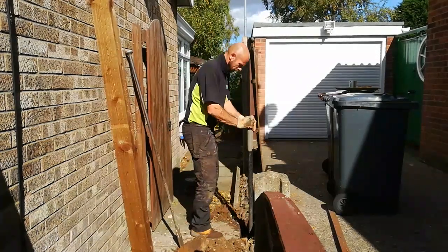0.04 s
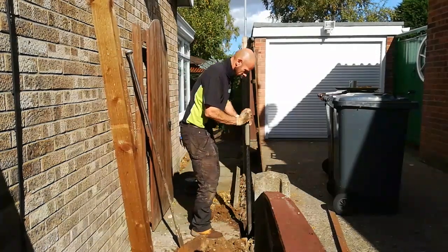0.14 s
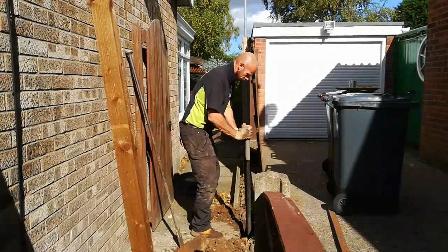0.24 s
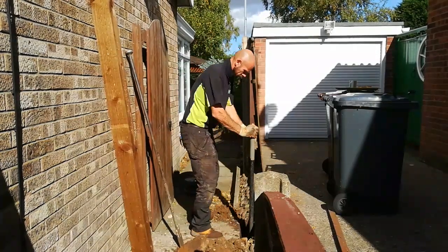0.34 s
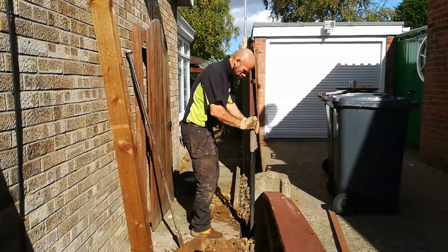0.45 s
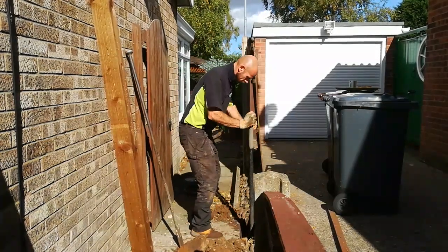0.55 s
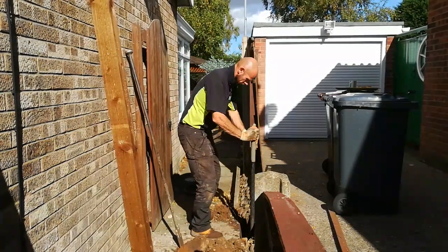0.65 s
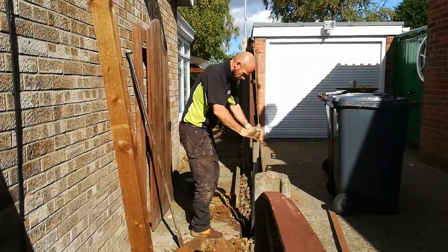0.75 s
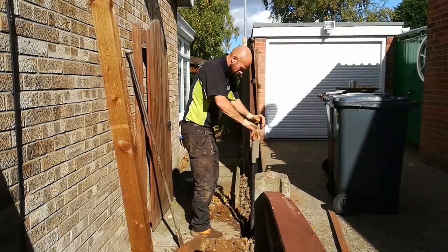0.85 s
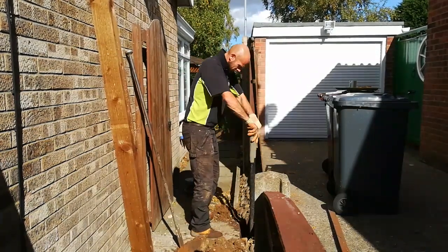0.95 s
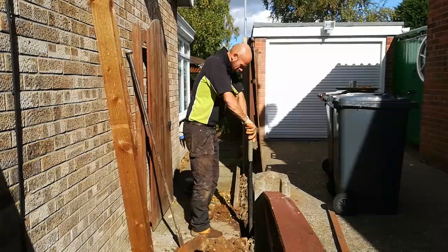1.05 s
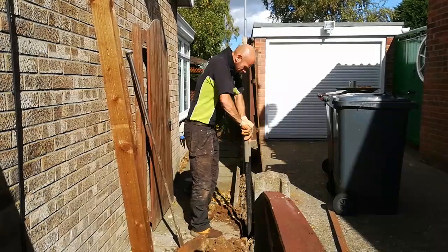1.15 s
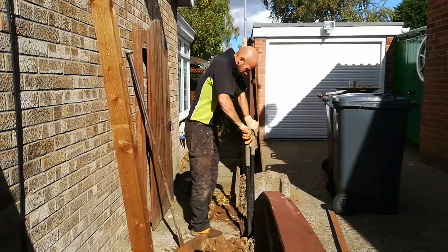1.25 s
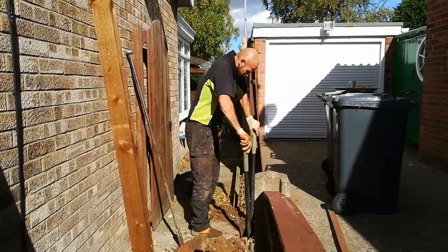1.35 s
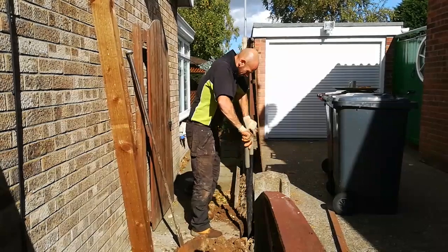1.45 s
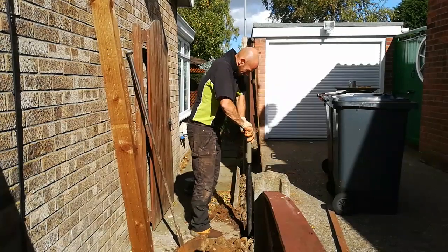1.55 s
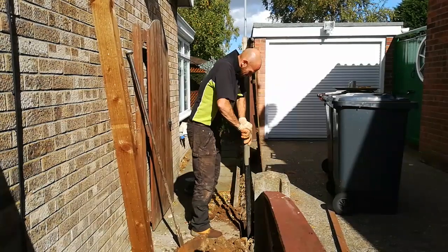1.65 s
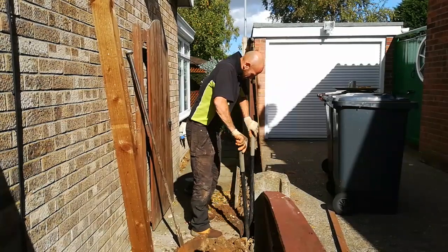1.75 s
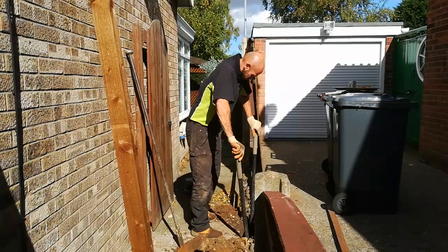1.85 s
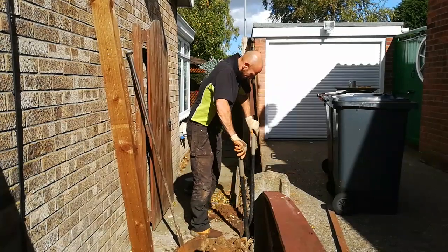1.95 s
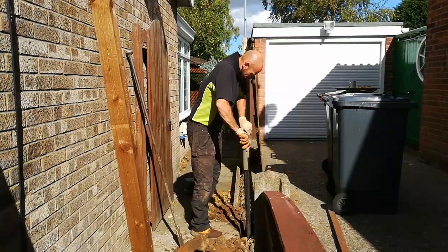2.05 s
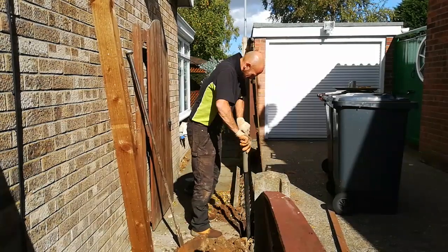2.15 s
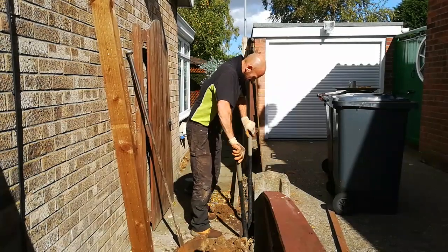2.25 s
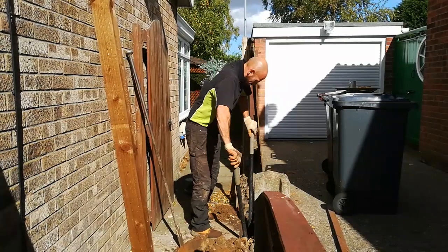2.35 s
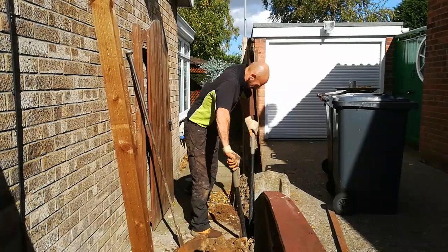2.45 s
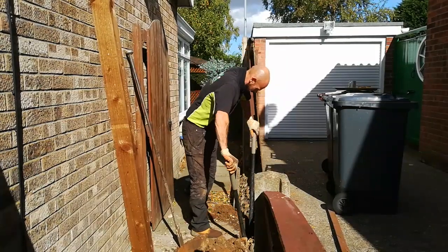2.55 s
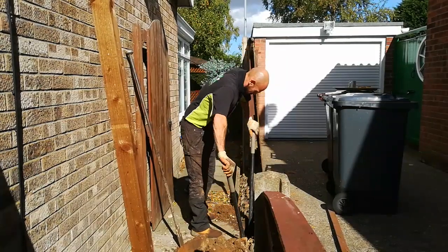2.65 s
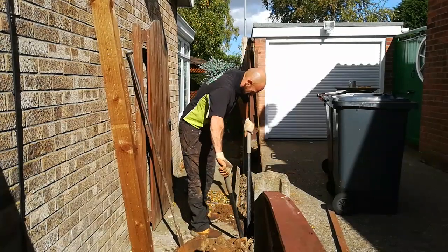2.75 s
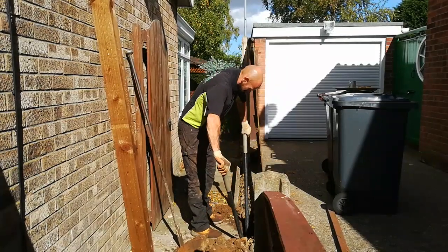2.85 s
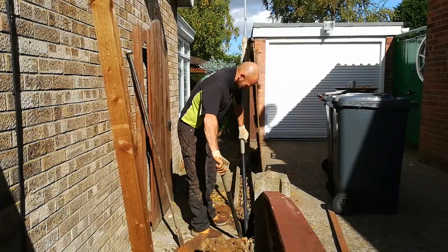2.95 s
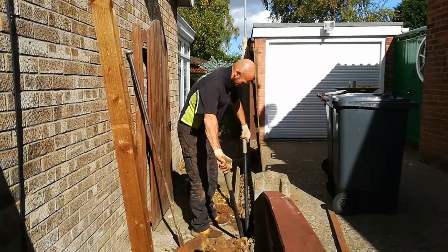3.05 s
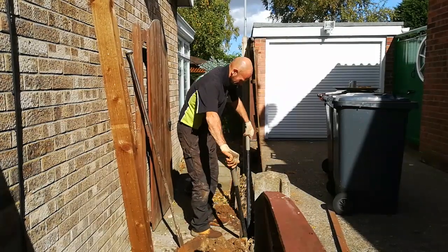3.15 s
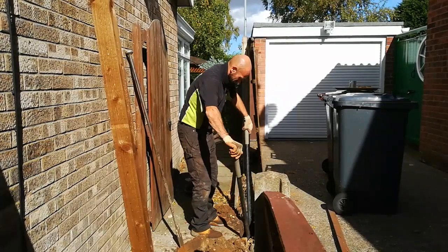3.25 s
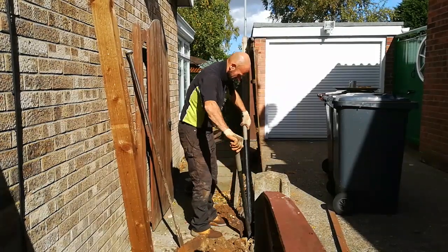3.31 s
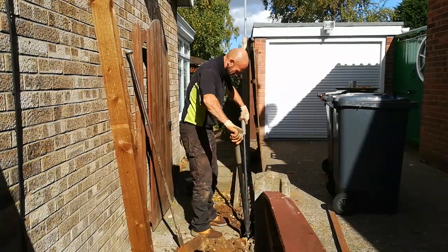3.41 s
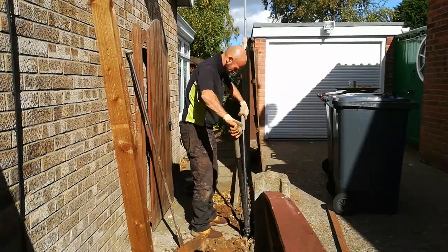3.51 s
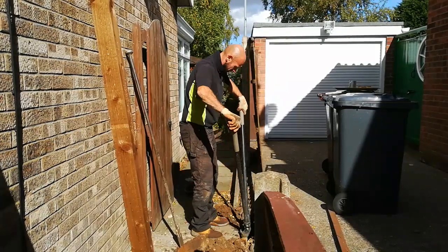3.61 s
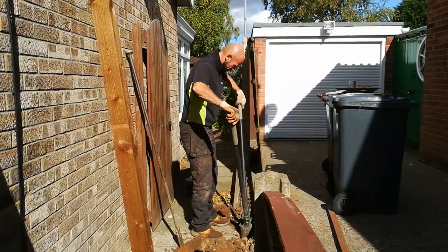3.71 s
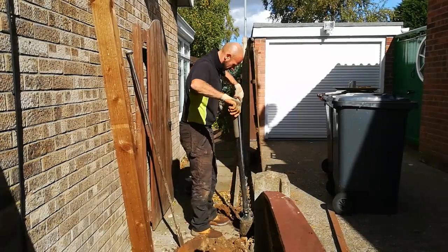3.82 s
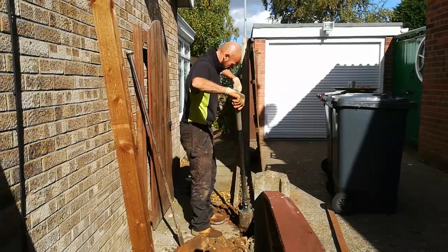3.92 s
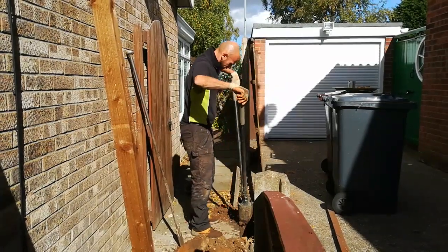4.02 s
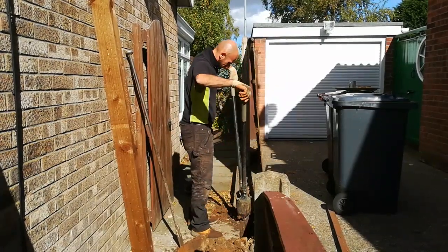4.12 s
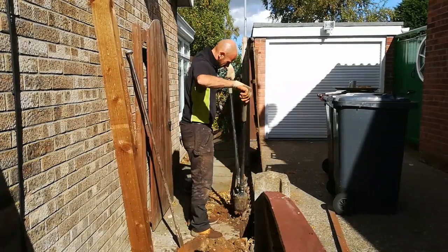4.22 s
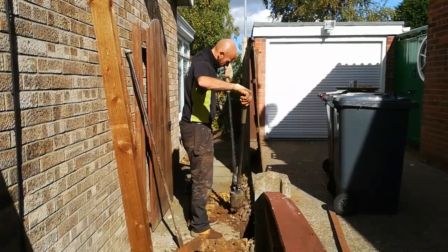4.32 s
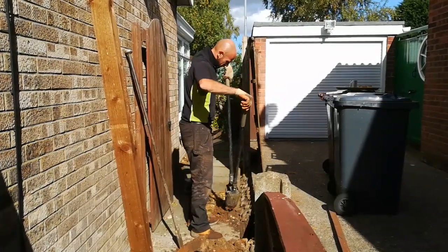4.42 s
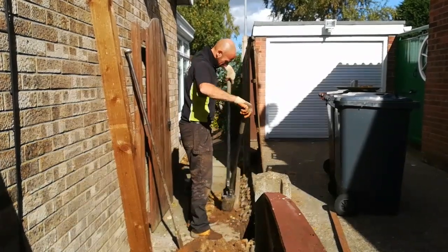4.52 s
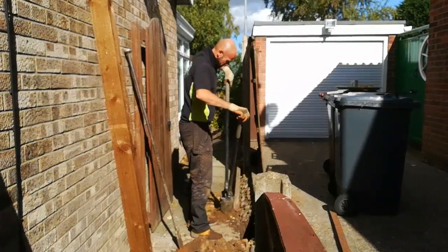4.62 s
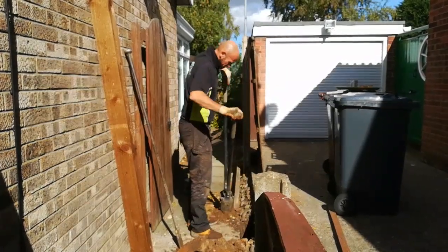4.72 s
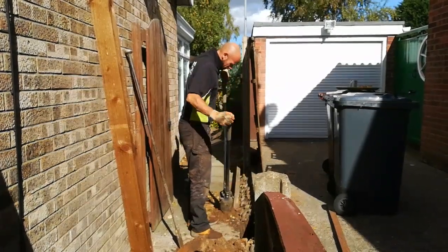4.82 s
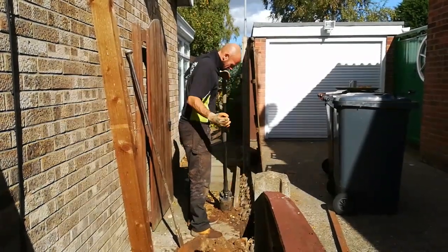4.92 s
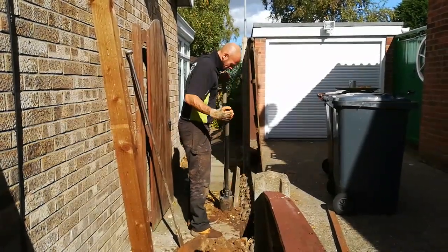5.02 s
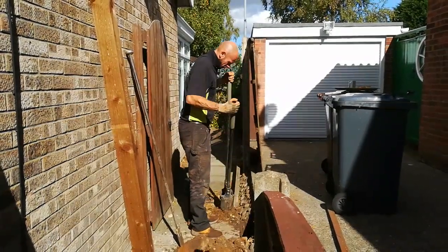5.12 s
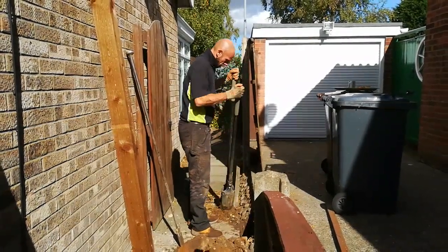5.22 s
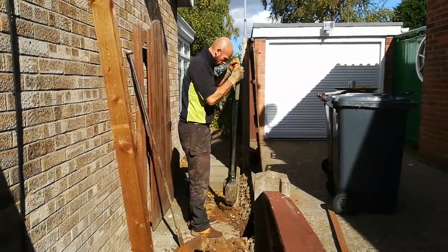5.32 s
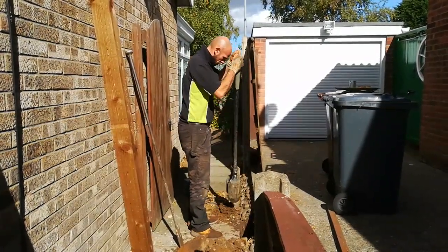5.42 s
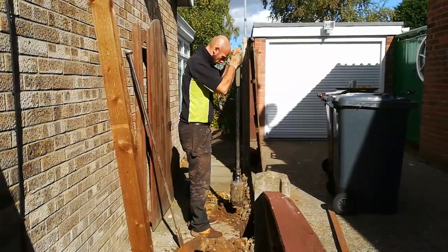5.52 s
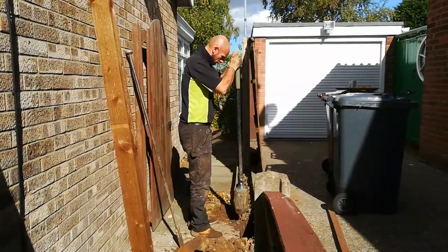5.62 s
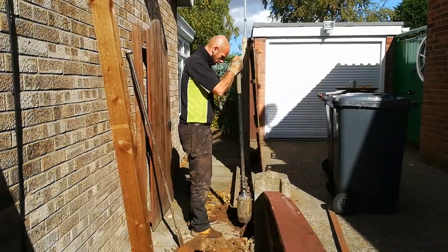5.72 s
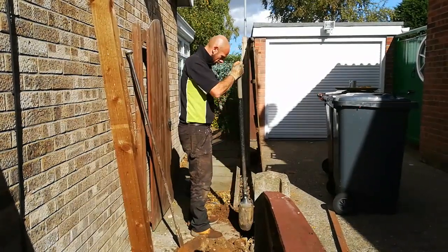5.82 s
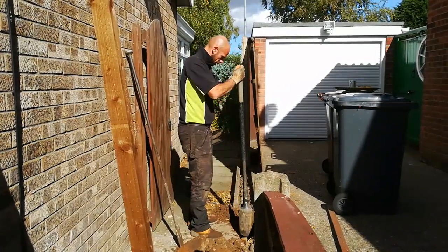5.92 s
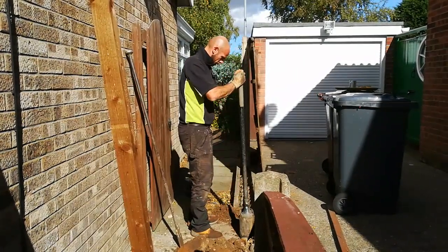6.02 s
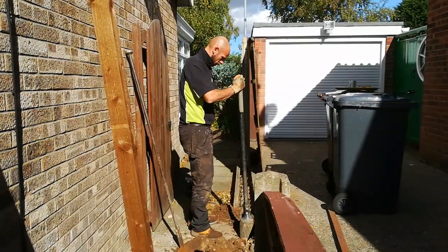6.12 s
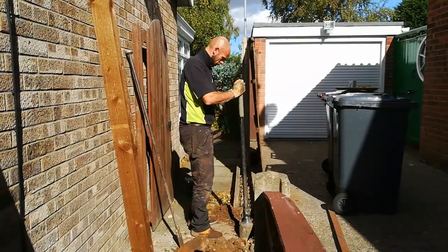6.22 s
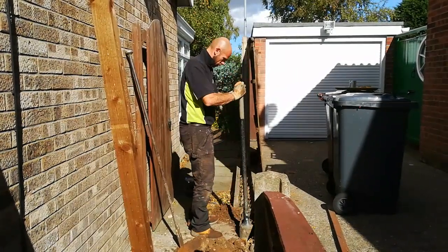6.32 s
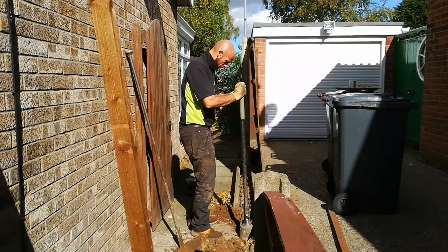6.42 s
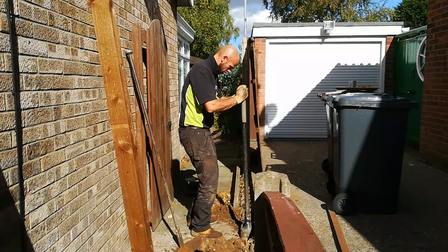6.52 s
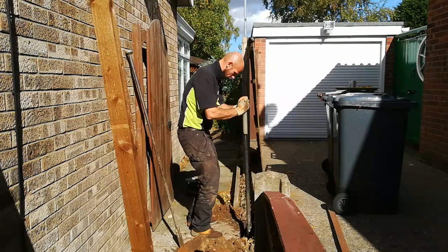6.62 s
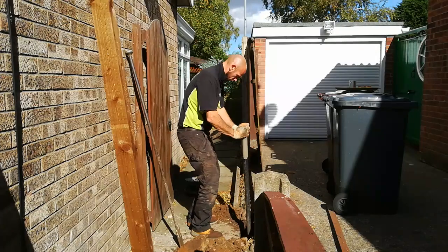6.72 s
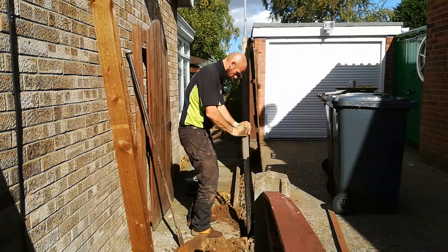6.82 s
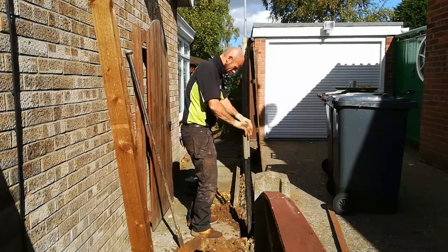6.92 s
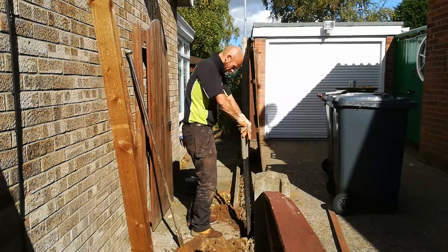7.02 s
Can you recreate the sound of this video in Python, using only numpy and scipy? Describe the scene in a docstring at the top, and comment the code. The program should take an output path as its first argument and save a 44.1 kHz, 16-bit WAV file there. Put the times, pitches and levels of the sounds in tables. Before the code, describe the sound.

A long steel spade works stony soil in a narrow outdoor passage. After a tiny skim and knock on stone, a hard thrust hits at 0.2 s, a sharp gritty crunch with a low thud and brief steely ring; a second follows at 0.55 s. A stone knock at 0.8 s leads into a short high squeak near 0.9 s. From 1 to 2.7 s the buried blade is levered: soft, uneven grinding strokes, small crunches, knocks and a weaker squeak around 1.4 s. Duller knocks come at 3.3 and 3.45 s. Crumbs slide off; a clod drops at 4.5 s, pebbles tick near 4.95 s, and faint clinks ring from 5.2 to 6.2 s. The third heavy thrust crunches and booms at 6.65 s, with small knocks after. Brick walls return short echoes. Faint traffic dwindles, then rises slightly; a lumpy low rumble fades after 4.5 s.

```python
"""Spade in stony soil

A long steel spade is driven into stony soil in a narrow passage between brick walls.
Three hard thrusts crunch and thud: bursts of shaped grain noise, resonant steel and low decaying sines.
Between them the levered blade grinds in grain noise, squeaks in short sines, and knocks and clinks on stones.
Far traffic, coloured noise, dwindles and returns a little over a lumpy low drone and still air."""
import sys
import numpy as np
from scipy import signal
from scipy.fft import rfft, irfft, next_fast_len
from scipy.io import wavfile

SR = 44100
rng = np.random.default_rng(int(sys.argv[2]) if len(sys.argv) > 2 else 0)


def generate_wav(signal):
    """Clip the signal to [-1, 1] and save it as 16-bit WAV at the path in sys.argv[1]."""
    frames = np.transpose(np.atleast_2d(signal))
    scaled = np.clip(frames, -1, 1) * 32767
    pcm = np.round(scaled).astype(np.int16)
    wavfile.write(sys.argv[1], SR, pcm)


N = 311346
TIME = np.arange(N) / SR

# All levels in the tables are relative; the layers and the mix trim them further.
# Blade crunches in the soil; at 4.5 s a clod is shaken off it and drops:
# (peak time [s], level [dB], rise [s], decay [s], body [dB], treble [dB],
# blade resonance [dB], note of the struck spot [Hz])
CRUNCHES = [(.175, -16, 0.0042, 0.0062, 1.5, -0.5, 3.5, 1280),
            (0.34, -39.5, 0.012, .015, -5, 2.5, 4.5, 1770), (.565, -18, 0.0065, 0.0053, 4, 1, 2, 1740),
            (1.457, -43.5, 0.0046, 0.017, 4.5, 16.5, -8, 4700),
            (1.622, -33.5, .002, 0.015, 2, -22, 3, 1180), (1.657, -40, 0.014, 0.022, 4, -27, 0, 2950),
            (1.917, -42.5, 0.012, .021, -16, -10.5, 8.5, 3300),
            (2.004, -38.5, 0.01, 0.0032, 1, 9.5, 8, 3240), (2.572, -40.5, 0.018, .012, 1, -6.5, -15, 1160),
            (2.637, -38.5, 0.0082, 0.011, 4.5, 5.5, 0, 2900),
            (4.502, -30, .005, 0.024, -6.5, 0.5, -11, 836),
            (6.654, -17.5, 0.0065, 0.0081, 2, 0.5, -5.5, 547)]
# Buried blade knocks on stones: (peak time [s], level [dB], treble [dB], rise [s], decay [s])
KNOCKS = [(.095, -31.5, -13, 0.005, 0.0063), (0.152, -29, 6.5, 0.00044, 0.0061),
          (.469, -42, -7, .007, 0.015), (0.773, -35.5, -27, .0008, 0.012), (1.095, -44, -16, .0007, .014),
          (1.41, -35.5, -13, .0017, 0.012), (3.296, -42.5, 1, 0.0059, 0.016),
          (3.445, -34.5, -0.5, 0.0041, 0.014), (3.973, -56.5, -5.5, 0.00077, 0.03),
          (6.589, -46.5, -8, 0.013, 0.013), (6.631, -27, 8, 0.00068, 0.012),
          (6.788, -41.5, -18, 0.0018, 0.011), (6.882, -46, -21, 0.0028, .005)]
# Blade is levered through the soil, one row a stroke: (start [s], length [s], grinding [dB], grit [dB])
STROKES = [(0.928, .05, -50.5, -87), (1.15, 0.11, -52, -57), (1.393, 0.18, -51, -61),
           (1.658, 0.11, -44, -53), (1.948, 0.14, -54.5, -62), (2.188, 0.11, -50, -61),
           (2.4, 0.1, -58.5, -64), (2.642, 0.041, -47, -72), (6.938, 0.025, -53, -67)]
# Crumbs slide off the lifted blade: (start [s], length [s], level [dB])
CRUMBS = [(3.73, 0.17, -72.5), (4.475, .03, -56), (4.894, 0.096, -57), (5.113, .02, -64)]
# Steel sticks and slips on stone: (start [s], length [s], pitch [Hz], glide [octaves], level [dB])
SQUEAKS = [(.854, 0.027, 3750, -0.02, -26.5), (.855, 0.014, 5470, 0.011, -39.5),
           (.872, .046, 3044, -0.025, -29.5), (.883, 0.016, 2500, .02, -33),
           (.886, 0.081, 3680, 0.0028, -46), (1.401, 0.019, 2290, 0.013, -35),
           (1.542, .012, 1765, 0.0067, -35.5)]
# Edge skims a stone just before a thrust: (start [s], length [s], level [dB])
SKIMS = [(0.087, 0.042, -49.5), (6.586, 0.02, -45)]
# High modes that a skim excites: (frequency [Hz], level [dB])
SKIM_MODES = [(7400, -4.5), (8320, 1), (11250, -4)]
# Lifted blade taps a stone and rings freely: (peak time [s], level [dB], treble [dB], rise [s])
CLINKS = [(5.159, -49.5, 8, 0.0022), (5.68, -54, -13, 0.0027), (5.772, -65.5, 3, 0.0045),
          (6.068, -43, -4.5, 0.0067), (6.177, -49.5, 12, 0.0018)]
# Pebbles drop off the blade: (peak time [s], level [dB])
PEBBLES = [(4.425, -65), (4.895, -56), (4.954, -47.5), (4.989, -55)]
# Whole spade jolts, with a thud in the ground, a woody clunk and a ring:
# (time [s], thud [Hz], thud [dB], deep boom [dB], clunk [Hz], clunk [dB], ring [dB])
JOLTS = [(.172, 125.2, -20.5, -39, 456, -34.5, -48), (.561, 111.3, -23.5, -29.5, 273, -34, -42),
         (2.636, 127, -52, -58, 560, -55, -56), (3.292, 118, -42, -60, 747, -59.5, -63),
         (3.445, 129, -55.5, -39, 760, -57, -63), (4.502, 88.4, -49.5, -62, 810, -43, -60),
         (6.645, 108.9, -16.5, -28.5, 546, -31, -44.5)]
# Deep boom of the ground: (frequency [Hz], level [dB], swell [s])
BOOM = [(46.2, -4.5, 0.061), (75.4, -0.5, 0.026)]

# Resonances of the blade held in the soil: (frequency [Hz], width [Hz], level [dB])
BLADE_IN_SOIL = [(1222, 49, 7.5), (1740, 170, 0), (2231, 120, 2.5), (2723, 116, 1), (3023, 14, -8),
                 (3275, 67.6, -1.5), (3750, 65, -4.5), (4153, 40, -4), (4700, 150, 0.5), (5410, 70, -11.5),
                 (6380, 130, -4.5), (7350, 130, -2.5), (7800, 70, -2), (8730, 160, 0.5), (10960, 90, 8)]
# Modes of the free blade: (frequency [Hz], width [Hz], level [dB])
FREE_BLADE = [(2234, 48, 11.5), (2890, 60, 4), (3300, 47, 7), (3880, 86, -6.5), (4150, 99, -1),
              (4460, 74, 0.5), (5370, 110, 0), (6100, 100, 3.5), (6650, 98, 4), (7840, 145, 7),
              (9550, 360, 5.5)]
# Long rings of the steel shaft: (frequency [Hz], level [dB], time to fall 60 dB [s])
SHAFT = [(1210, -1, 0.45), (2000, 0.5, .25), (2650, -2, .2), (3260, -5.5, 0.41), (4770, -7.5, 0.242),
         (7220, -5, 0.15), (8300, -12, .23), (10600, -7.5, 0.16)]
# Longest ring, a close group that beats: (frequency [Hz], level [dB], time to fall 60 dB [s])
SINGING = [(3575, -6, .6), (3614, -5, .7), (3675, -5, .6)]

# Spectrum of breaking soil: (frequency [Hz], density [dB per Hz])
SOIL = [(60, -5.5), (170, 6), (330, -3), (600, 0.5), (1000, -1.5), (1600, -2), (3000, -0.5), (4500, -5),
        (7000, -8), (10000, -14.5), (15500, -14.5)]
# Spectrum of steel meeting stone: (frequency [Hz], density [dB per Hz])
STONE = [(100, -18.5), (500, -3.5), (1500, -0.5), (2300, -0.5), (3000, 3.5), (4600, -1), (6200, -10),
         (8000, -12.5), (11000, -23), (15500, -23)]
# Spectrum of coarse grinding: (frequency [Hz], density [dB per Hz])
GRIND = [(150, -22.5), (500, 6), (1200, 0.5), (3000, 3), (4700, -0.5), (7000, -18.5), (14000, -30)]
# Spectrum of sand and pebbles: (frequency [Hz], density [dB per Hz])
GRIT = [(1500, -34), (4500, 1), (7200, 1), (9500, -7.5), (12500, -10.5), (15500, -6.5)]
# Spectrum of still air: (frequency [Hz], density [dB per Hz])
AIR = [(12, -30), (20, 3.5), (45, 4), (85, -43), (245, -7.5), (324, -20.5), (416, -19), (452, -23.5),
       (1820, -24.5), (2150, -45), (2400, -39), (3350, -38), (3960, -36), (12400, -38), (15500, -40)]
# Spectrum of far tyres: (frequency [Hz], density [dB per Hz])
TRAFFIC = [(30, -6.5), (70, 12), (130, 8), (220, 6), (380, -6), (600, -2.5), (950, 5), (1500, -3.5),
           (2500, -11.5), (5000, -21.5), (12000, -51)]

# Low rumble: (time [s], level [dB])
RUMBLE_LEVEL = [(0, -54), (.2, -42), (1.3, -36), (1.95, -43), (2.7, -36.5), (3.85, -48), (4.3, -40.5),
                (4.7, -60.5), (7.06, -59.5)]
# Far traffic: (time [s], level [dB])
TRAFFIC_LEVEL = [(0, -44.5), (1.8, -46), (2.4, -54), (4.8, -60.5), (6.2, -59), (7.06, -56.5)]
# Ring of the passage: (frequency [Hz], time to fall 60 dB [s])
PASSAGE = [(150, 0.59), (600, 0.32), (2000, 0.23), (5000, 0.23), (9000, 0.26), (15000, 0.18)]
# Stereo image of diffuse sound: (frequency [Hz], left-right likeness [-1 to 1])
LIKENESS = [(60, 0.99), (130, 0.98), (290, 0.79), (640, -0.49), (1400, -0.11), (3000, -0.11), (15000, -0.1)]
# The two microphones differ, before each side's power is evened: (frequency [Hz], left minus right [dB])
PORTS = [(200, 2), (600, 1), (2000, -1.7), (4500, 1), (8500, 5), (12000, 1.5), (15500, -5.5)]


def crunches(per_s=9000, spread_db=3.0, note_db=6.5, sharpness=16):
    """Soil breaks in a dense crunch; packed earth adds body, grit adds treble, stones excite the blade."""
    crunch = colour(grains(per_s, spread_db), SOIL)
    body = butter(crunch, 1000, "low")
    middle = butter(crunch, [1000, 5000], "band")
    treble = butter(crunch, 5000, "high")
    soil, on_steel = np.zeros((2, N))
    for s, db, rise, decay, body_db, treble_db, steel_db, note_hz in CRUNCHES:
        on = around(s)
        # the middle band has the opposite sign, so that the crossovers add up
        mix = from_db(body_db) * body[on] - middle[on] + from_db(treble_db) * treble[on]
        burst = from_db(db) * swell(s, rise, decay) * mix
        note = signal.lfilter(*signal.iirpeak(note_hz, sharpness, fs=SR), burst)
        soil[on] += burst + from_db(note_db) * note
        on_steel[on] += burst * from_db(steel_db)
    return soil + resonate(on_steel, BLADE_IN_SOIL)


def knocks():
    """The edge meets a buried stone, grates on it for a moment and sets the held blade resonating."""
    crack = grating(KNOCKS, colour(grains(per_s=6000, spread_db=-1.5), STONE))
    return crack + resonate(crack, BLADE_IN_SOIL)


def scrapes(grind_db=-0.5, grit_db=1.5, crumb_db=-1.5, uneven_db=1.5, steel_db=-2.0):
    """Sand and small stones grind unevenly along the steel; crumbs run off when it is lifted."""
    grinding, grit = sum(np.outer(from_db(levels), stroke(s, length)) for s, length, *levels in STROKES)
    crumbs = from_db(crumb_db) * sum(from_db(db) * stroke(s, length) for s, length, db in CRUMBS)
    stones = grains(per_s=260, spread_db=5.5)
    sand = grains(per_s=2500, spread_db=4.5)
    coarse = stones * (grinding * from_db(grind_db) + crumbs)
    fine = sand * (grit * from_db(grit_db) + crumbs)
    slips = from_db(uneven_db * drift(rate=52))
    rub = colour(coarse * slips, GRIND) + colour(fine, GRIT)
    # the point of contact wanders, favouring now one resonance, now another
    return rub + from_db(steel_db) * resonate(rub, BLADE_IN_SOIL, wander_db=8.0)


def squeaks(waver=0.026, octave_db=-20):
    """Stick and slip makes short, unsteady, gliding tones; a skim sounds several high modes together."""
    out = np.zeros(N)
    skims = [(s, length, hz, 0, db + mode_db) for s, length, db in SKIMS for hz, mode_db in SKIM_MODES]
    for s, length, hz, glide, db in SQUEAKS + skims:
        on = slice(int(s * SR), int((s + length) * SR))
        along = np.linspace(0, 1, on.stop - on.start)
        pitch_hz = hz * 2 ** (glide * along) * (1 + waver * drift(rate=900)[on])
        phase = 2 * np.pi * np.cumsum(pitch_hz) / SR
        # the octave is left out where it would lie too high
        octave = from_db(octave_db) * np.sin(2 * phase) * (4 * hz < SR)
        out[on] += from_db(db) * np.sin(np.pi * along) * (np.sin(phase) + octave)
    return out


def clinks(decay_s=0.008, level_db=2.5):
    """Out of the soil the blade is free, so its modes are favoured over the halved contact noise."""
    contacts = [(*row, decay_s) for row in CLINKS]
    touch = grating(contacts, colour(grains(per_s=12000, spread_db=1.5), STONE))
    return from_db(level_db) * (touch / 2 + resonate(touch, FREE_BLADE))


def shaft():
    """Hard blows leave the steel singing in decaying sines after the crunch has died."""
    blows = np.zeros(N)
    for s, *_, ring_db in JOLTS:
        blows[round(s * SR)] = from_db(ring_db)
    return sum(from_db(db) * ring(blows, hz, t60) for hz, db, t60 in SHAFT + SINGING)


def pebbles(rise_s=0.00032, decay_s=0.0045):
    """Small stones land with a bright, dry tick of noise."""
    contacts = [(s, db, 0, rise_s, decay_s) for s, db in PEBBLES]
    return grating(contacts, colour(rng.standard_normal(N), GRIT))


def thuds(thud_swell_s=0.01783, clunk_swell_s=0.012, flex_hz=100, flex_t60=0.515, flex_db=-64):
    """Each jolt swells and dies in low sines of ground and clunk, and the long shaft goes on flexing."""
    out = np.zeros(N)
    for s, thud_hz, thud_db, boom_db, clunk_hz, clunk_db, _ in JOLTS:
        on = around(s)
        age = np.maximum(TIME[on] - s, 0)
        tones = [(thud_hz, thud_db, thud_swell_s), (clunk_hz, clunk_db, clunk_swell_s)]
        tones += [(hz, boom_db + db, swell_s) for hz, db, swell_s in BOOM]
        for hz, db, swell_s in tones:
            envelope = age / swell_s * np.exp(1 - age / swell_s)
            out[on] += from_db(db) * envelope * np.sin(2 * np.pi * hz * age)
    return out + from_db(flex_db) * ring(out, flex_hz, flex_t60)


def passage(x, direct_db=-5.5, walls_db=-1.5, build_s=0.001, size=22050):
    """The direct sound, then close brick walls throw it back in a dense tail, duller as it dies."""
    age, hz = np.arange(size) / SR, np.fft.rfftfreq(size, 1 / SR)
    white, tail = rfft(rng.standard_normal((2, size))), 0
    for k, (_, t60) in enumerate(PASSAGE):
        # each band fades over into its neighbours
        share = at_hz([(band_hz, j == k) for j, (band_hz, _) in enumerate(PASSAGE)], hz)
        tail = tail + irfft(white * share) * np.exp(-np.log(1000) * age / t60)
    tail = tail * (1 - np.exp(-age / build_s))
    tail = rms_one(diffuse(*tail)) / np.sqrt(size)
    echoes = signal.fftconvolve(x[None], tail, axes=1)[:, :N]
    return from_db(direct_db) * x + from_db(walls_db) * echoes


def rumble(centre_hz=48.1, wander_hz=3.5, level_db=-0.5, sub_db=-2.5, lumps_db=5.0, lumps_per_s=17, crest=0.81):
    """A wavering low drone and a bed of low noise swell together in flat-topped lumps."""
    drone = np.sin(2 * np.pi * np.cumsum(centre_hz + wander_hz * drift(rate=28)) / SR)
    bed = rms_one(butter(rng.standard_normal(N), [30, 50], "band")) / 2
    lumps = lumps_db * np.minimum(drift(rate=lumps_per_s), crest)
    course_db = np.interp(TIME, *np.transpose(RUMBLE_LEVEL))
    return from_db(level_db + lumps + course_db) * (drone + from_db(sub_db) * bed)


def surroundings(air_db=-57.0, traffic_trim_db=-1.0):
    """Still outdoor air and the wash of far tyres, both wide coloured noise."""
    air = diffuse(*[colour(white, AIR) for white in rng.standard_normal((2, N))])
    traffic = diffuse(*[colour(white, TRAFFIC) for white in rng.standard_normal((2, N))])
    course_db = np.interp(TIME, *np.transpose(TRAFFIC_LEVEL))
    return from_db(air_db) * air + from_db(traffic_trim_db + course_db) * traffic


def grains(per_s, spread_db):
    """Tiny fractures of sand and stone: random clicks of either sign, uneven in size; rms 1."""
    sizes = from_db(spread_db * np.minimum(rng.exponential(1, N), 4))
    signed = sizes * rng.choice([-1, 1], N)
    return rms_one(signed * (rng.random(N) < per_s / SR))


def grating(contacts, noise):
    """Contacts (time [s], level [dB], treble [dB], rise [s], decay [s]) open the noise, each with its tint."""
    out = np.zeros(N)
    lower, treble = butter(noise, 5000, "low"), butter(noise, 5000, "high")
    for s, db, treble_db, rise, decay in contacts:
        on = around(s)
        # opposite signs make the crossover add up
        out[on] += from_db(db) * swell(s, rise, decay) * (lower[on] - from_db(treble_db) * treble[on])
    return out


def resonate(force, modes, wander_db=0.0):
    """Damped resonances of the steel; with wander_db, as in scraping, their strengths vary."""
    out = np.zeros(N)
    for hz, width, db in modes:
        mode = signal.lfilter(*signal.iirpeak(hz, hz / width, fs=SR), force + 1e-18)
        out += from_db(db + wander_db * drift(rate=18)) * mode
    return out


def ring(x, hz, t60):
    """A unit click sets a decaying sine ringing, its height starting near 1."""
    r, w = from_db(-60 / (t60 * SR)), 2 * np.pi * hz / SR
    return signal.lfilter([0, np.sin(w)], [1, -2 * r * np.cos(w), r * r], x + 1e-18)


def swell(s, rise, decay):
    """Force that builds up exponentially to time s and lets go."""
    age = TIME[around(s)] - s
    return np.exp(-np.minimum(np.maximum(-age / rise, age / decay), 20))


def stroke(start, length, rise_s=0.038, release_s=0.035):
    """A push builds up, holds for its length and lets go."""
    outside = np.maximum((start - TIME) / rise_s, (TIME - start - length) / release_s)
    return np.exp(-np.clip(outside, 0, 20))


def around(s, size=17640):
    """The samples within 0.4 s of time s."""
    return slice(max(int(s * SR) - size, 0), int(s * SR) + size)


def drift(rate):
    """Random wander: straight lines between normally spread points, rate of them a second."""
    knots = rng.standard_normal(1 << 14)
    return np.interp(TIME * rate, np.arange(len(knots)), knots)


def colour(x, spectrum, size=4096):
    """Causal minimum-phase filter with the given spectrum; white noise keeps its power."""
    gain = rms_one(from_db(at_hz(spectrum, np.fft.rfftfreq(size, 1 / SR))))
    # folding the cepstrum forward puts the energy as early as it can be
    fold = np.r_[1, np.full(size // 2 - 1, 2), np.zeros(size // 2)]
    cepstrum = irfft(np.log(gain)) * fold
    return signal.oaconvolve(x, irfft(np.exp(rfft(cepstrum))))[:len(x)]


def diffuse(first, second):
    """Two unrelated signals become sound from all round: alike in the bass, wide above."""
    size = next_fast_len(len(first), True)
    alike = np.clip(at_hz(LIKENESS, np.fft.rfftfreq(size, 1 / SR)), -.99, .9995)
    mid = irfft(rfft(first, size) * np.sqrt((1 + alike) / 2), size)
    side = irfft(rfft(second, size) * np.sqrt((1 - alike) / 2), size)
    return np.array([mid + side, mid - side])[:, :len(first)]


def butter(x, hz, kind):
    """Butterworth filter of design order 2."""
    return signal.sosfilt(signal.butter(2, hz, kind, fs=SR, output="sos"), x + 1e-18)


def at_hz(points, hz):
    """Reads a curve along a logarithmic frequency axis."""
    known_hz, values = np.transpose(points)
    return np.interp(np.log(np.maximum(hz, 1)), np.log(known_hz), values)


def from_db(db):
    """Decibels to gain."""
    return np.exp(np.asarray(db) * (np.log(10) / 20))


def rms_one(x):
    """Scales to an rms of 1."""
    return x / np.sqrt(np.mean(x ** 2) + 1e-20)


def scene():
    """The spade in its passage, then the thuds, the rumble and the surroundings without wall echoes."""
    spade = from_db(-2.5) * (crunches() + knocks() + scrapes() + clinks()) + squeaks()
    # the shaft and the pebbles are clear of the hole, so more of them arrives directly
    exposed = shaft() + pebbles()
    left, right = passage(spade + exposed) + from_db(-5.0) * exposed
    left = colour(left, [(hz, db / 2) for hz, db in PORTS])
    right = colour(right, [(hz, -db / 2) for hz, db in PORTS])
    return np.array([left, right]) + thuds() + rumble() + surroundings()


def record(dry):
    """The deepest bass, below 20 Hz, and the top, above 15.9 kHz, are cut."""
    top_cut = signal.ellip(10, .1, 80, 15900, fs=SR, output="sos")
    return signal.sosfilt(top_cut, butter(dry, 20, "high"))


dry = scene()
out = record(dry)
generate_wav(out)
```